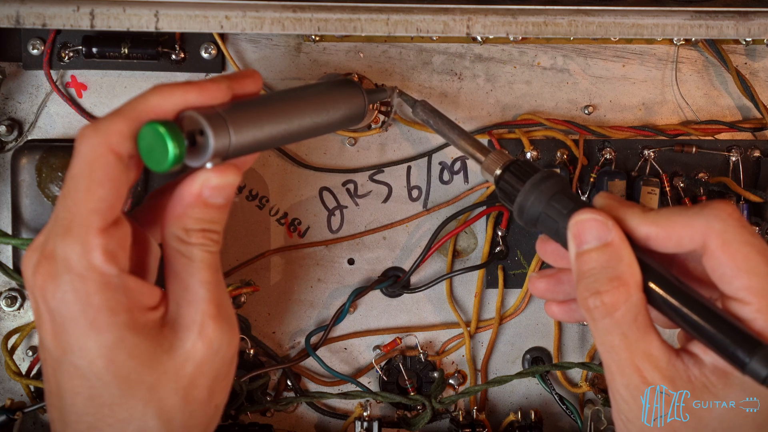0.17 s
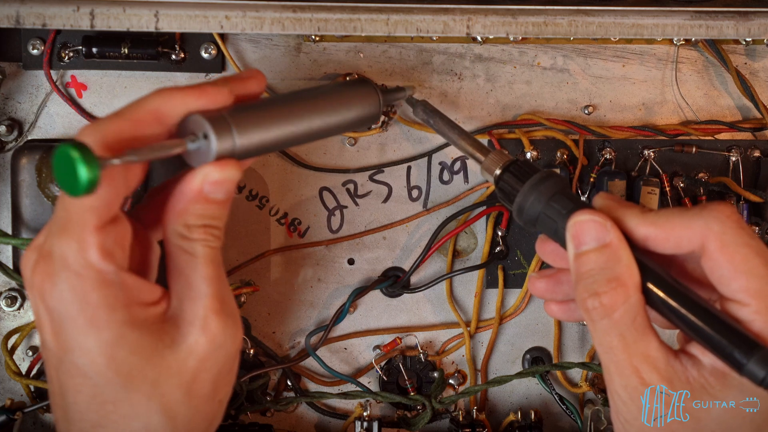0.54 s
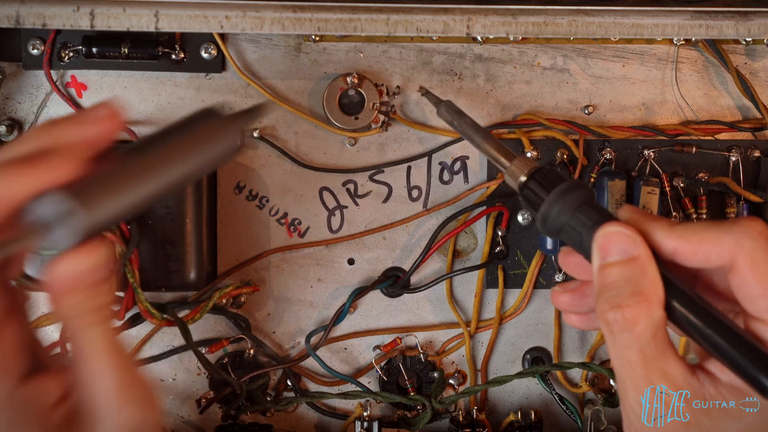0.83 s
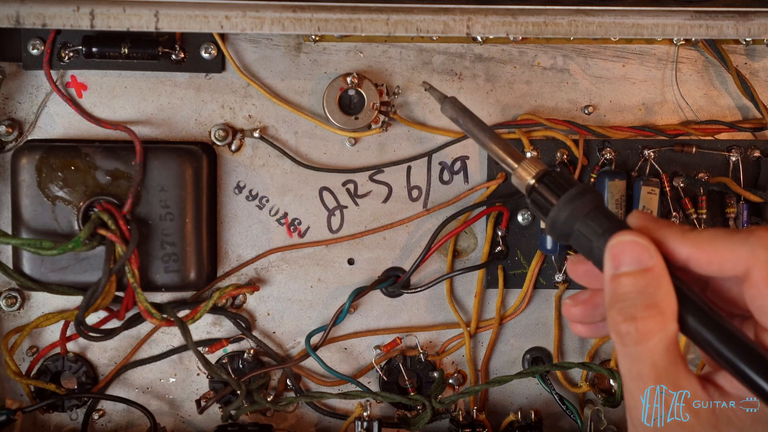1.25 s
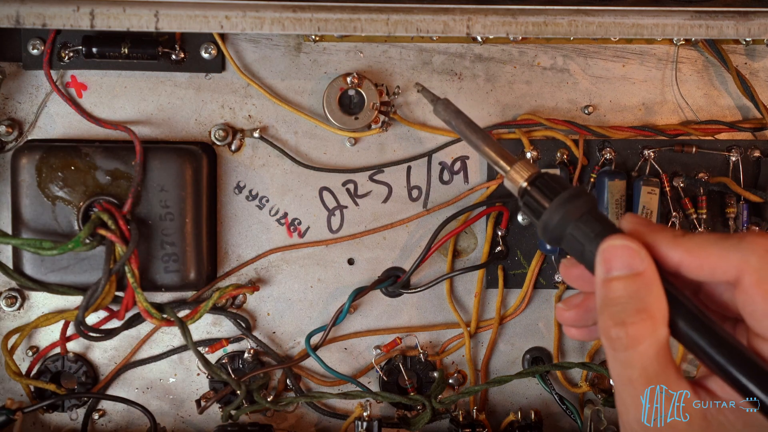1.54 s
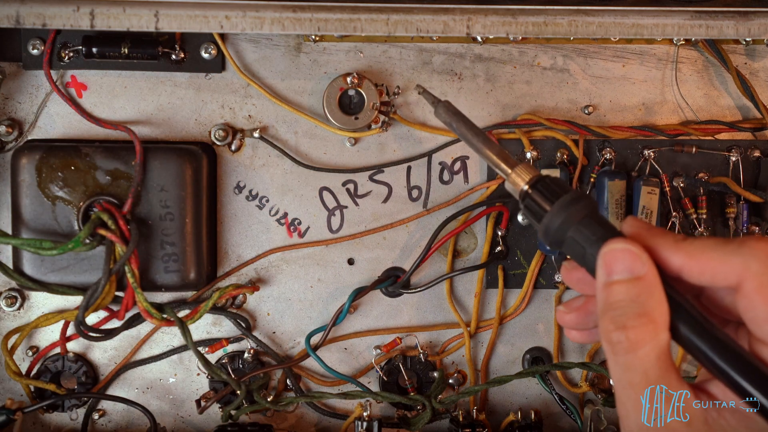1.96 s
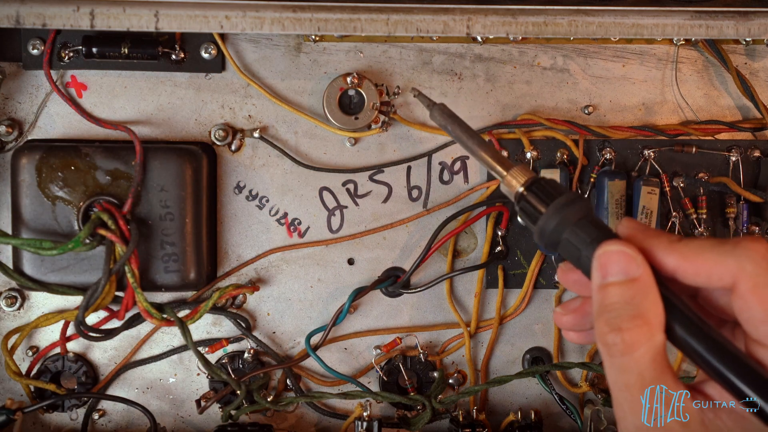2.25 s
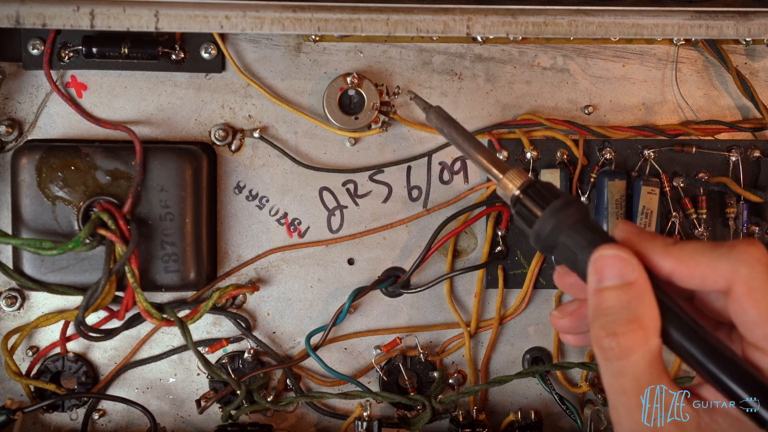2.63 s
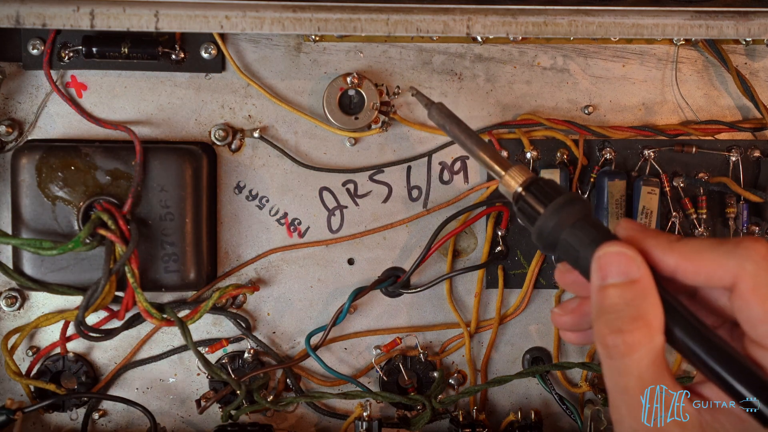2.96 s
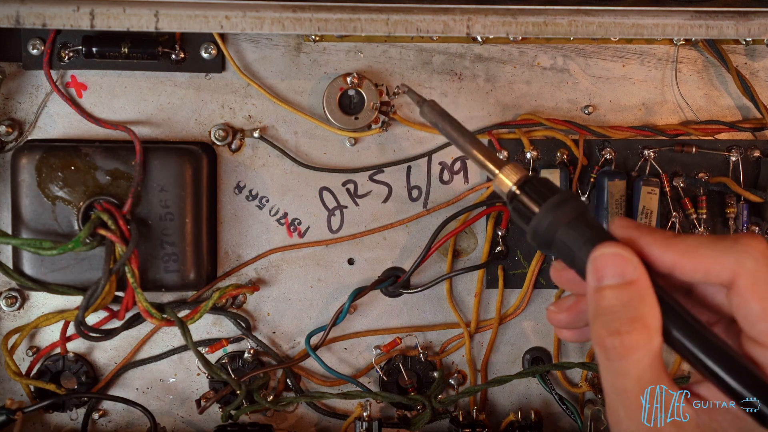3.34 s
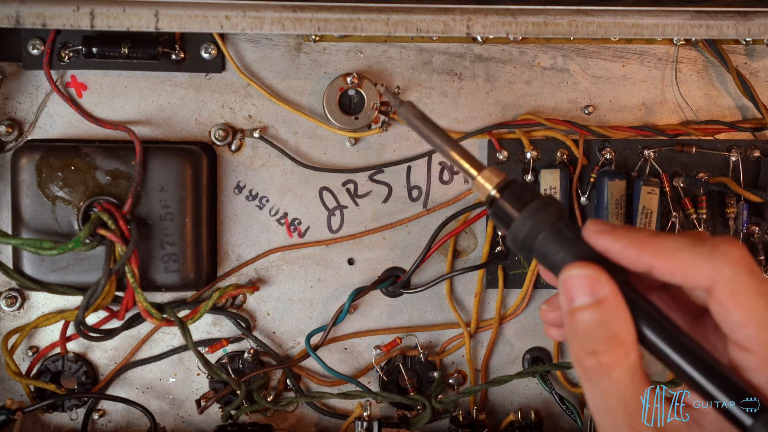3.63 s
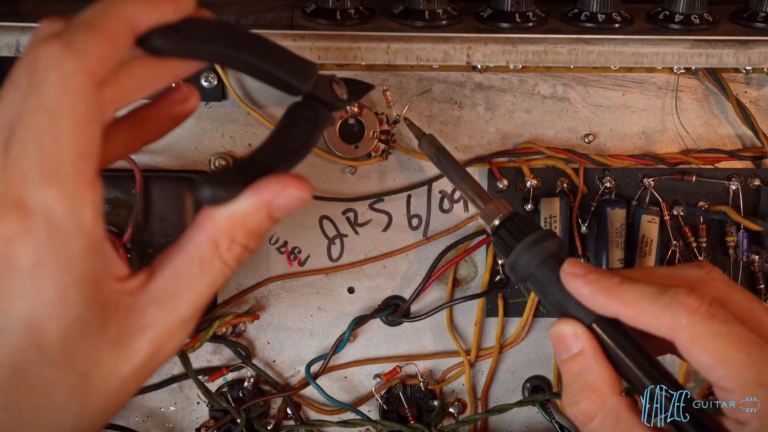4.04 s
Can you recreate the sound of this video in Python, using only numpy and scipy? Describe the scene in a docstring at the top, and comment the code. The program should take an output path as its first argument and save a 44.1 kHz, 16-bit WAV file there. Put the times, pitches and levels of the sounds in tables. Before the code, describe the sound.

One tiny handling click, then a desoldering pump snaps violently against a hollow steel chassis, its low ring fading quickly. A crisp ping comes a little later, then quick clicking and gritty sliding with firm catches and light bench knocks. Sparse small ticks end it. The microphone is close and dry, with short bench reflections, a small room tail, and low hiss and hum.

```python
"""Solder pump at a bench

A spring-loaded pump fires against a steel amplifier chassis, then is cocked and handled beside a bench.
Noise-driven modal bodies make the piston rattle, latch clicks and pings; dying sines boom the chassis and bench.
Dense small slips make the scrapes, with a noise puff and a sine squeak; a quiet hum and hiss run beneath.
The bench top and a small room throw the contacts back as early echoes and sparse dying taps."""
import sys
import numpy as np
from scipy import signal
from scipy.fft import rfft, irfft
from scipy.io import wavfile
from scipy.ndimage import uniform_filter1d

SR = 44100
rng = np.random.default_rng(int(sys.argv[2]) if len(sys.argv) > 2 else 0)


def int16_out(signal):
    """Quantize to a 16-bit WAV file."""
    q = np.round(np.clip(np.atleast_2d(signal).T, -1, 1) * 32767)
    wavfile.write(sys.argv[1], SR, q.astype(np.int16))


N = 184646


def gain_of(db):
    """Decibels to gain."""
    return 10 ** (np.asarray(db) / 20)


def evened(x):
    """Scales to rms 1."""
    return x / np.sqrt(np.mean(x ** 2) + 1e-20)


def read(points, hz):
    """Reads a (Hz, value) table on a log frequency axis."""
    f, value = np.transpose(points)
    return np.interp(np.log(hz + 1), np.log(f + 1), value)


def add(mix, start_s, sound):
    """Mixes a sound in at a time."""
    part = mix[max(round(start_s * SR), 0):][:len(sound)]
    part += sound[:len(part)]


def ring(modes, seconds):
    """Dying sines that take about a cycle to build up; neighbours swing in opposite sense."""
    hz, db, t60_s = np.transpose(modes)[:, :, None]
    t = np.arange(round(seconds * SR)) / SR
    sense = (-1) ** np.arange(len(modes))[:, None]
    envelope = gain_of(db - 60 * t / t60_s) * (1 - np.exp(-2.5 * hz * t))
    return (sense * envelope * np.sin(2 * np.pi * hz * t)).sum(0)


def tick(modes, extra_db=0., damping=0.88):
    """The causal answer of a small, well damped body to one sharp tap; it radiates little bass."""
    f = np.fft.rfftfreq(2048, 1 / SR)
    hz, width_hz, db = np.transpose(modes)[:, :, None]
    resonance = 1 / (1 + (2 * (f - hz) / width_hz / damping) ** 2) ** 2
    power = (gain_of(2 * (db + extra_db)) * resonance).sum(0)
    log_gain = np.log(power / (1 + (850 / (f + 1)) ** 4) + 1e-10) / 2
    # folding the cepstrum gives minimum phase
    cepstrum = irfft(log_gain)
    cepstrum[1:1024] *= 2
    cepstrum[1025:] = 0
    return irfft(np.exp(rfft(cepstrum)))[:1024]


def strike(near, far, start_s, modes, peak_db, contact_ms, colour_db=0.):
    """A rough contact drives the body; the room, hearing it from all sides, gets a more even colour."""
    t = np.arange(800) / SR * 1000 / np.clip(contact_ms, .02, 6)
    contact = np.exp(-t) * rng.standard_normal(len(t)) * 0.84 * contact_ms
    contact[0] = .75  # first touch
    sound = signal.fftconvolve(tick(modes, colour_db), contact)
    sound *= gain_of(peak_db) / abs(sound).max()
    spread = tick(modes, colour_db, damping=1.8)
    add(near, start_s, sound)
    add(far, start_s, spread * np.linalg.norm(sound) / np.linalg.norm(spread))


# Hiss colour. Each row: frequency in Hz, relative level in dB.
HISS = [(15, -60), (25, -28.5), (48, -9), (180, -7.5), (206, -14), (229, -1), (263, -4), (326, -5.5),
        (545, -15.5), (591, -12.5), (1160, -12.5), (1560, -17), (2760, -25.5), (14800, -33.5),
        (16000, -42.5)]
HISS_DB = -65.5
# Mains hum. Each row: frequency in Hz, level in dB rms about which it wavers.
HUM = [(60, -86.5), (120, -77.5), (180, -82.5), (241, -75.5), (360, -78.5), (470, -85)]


def background():
    """Room air and microphone hiss with drifting patches below 2 kHz, and a wavering mains hum."""
    frames, hz = N // 512 + 5, np.fft.rfftfreq(2048, 1 / SR)
    real, imaginary, patches = rng.standard_normal((frames, 1025, 3)).T
    patches = evened(uniform_filter1d(uniform_filter1d(patches, 16, 0), 10, 1))
    colour_db = read(HISS, hz)[:, None] + 0.43 * patches * (hz[:, None] < 2000)
    spectrum = (real + 1j * imaginary) * gain_of(colour_db)
    out = gain_of(HISS_DB) * evened(signal.istft(spectrum, nperseg=2048, noverlap=1536)[1][:N])
    t = np.arange(N) / SR
    for hum_hz, db in HUM:
        waver = evened(uniform_filter1d(uniform_filter1d(rng.standard_normal(N), 3000), 3000))
        tone = np.sqrt(2) * np.sin(2 * np.pi * (hum_hz * t + rng.random()))
        out += gain_of(db + 2.5 * waver) * tone
    return out


# Latch body modes. Each row: frequency in Hz, width in Hz before damping, relative level in dB.
LATCH = [(1070, 1900, -15.5), (2078, 777, -9.5), (3225, 1200, -8), (4010, 507.6, 0.5), (4426, 450, 3),
         (5063, 640, -3), (5650, 460, -18), (7010, 1770, -12.5), (8630, 2000, -19.5), (11900, 2400, -24.5),
         (14740, 1800, -27)]
# Single handling clicks. Each row: start in seconds, peak in dB before the mix, low-mode boost in dB.
CLICKS = [(.0089, -19.5, 13), (.1918, -58, -2), (1.850, -42.5, 1), (1.8993, -37, -3.5), (1.9415, -42.5, 2),
          (1.9593, -32, 5), (1.9663, -3, -19), (1.9854, -27, -0.5), (1.9957, -30, 4), (2.0132, -30, 6),
          (2.0222, -31.5, 9), (2.379, -40.5, -2.5), (2.391, -35.5, 16), (2.3981, -27.5, 5.5),
          (2.421, -36.5, 9), (2.5322, -39.5, -2), (3.3882, -55, 12), (3.4596, -59, -2)]
# Plunger pressed home. Each row: catch in seconds, reference level in dB, ride in ms.
LATCHINGS = [(2.2411, -7.5, 27.1), (2.581, -3, 22.7)]
# Parts of one latching. Each row: place in rides from the catch, level in dB re the latching,
# low-mode boost in dB.
STEPS = [(-0.99, -16.5, 3.5), (-0.38, -14, 4.5), (0, -1, 2.5), (0.45, -22, 8)]
CONTACT_MS, CONTACT_MS_PER_DB, LONGEST_MS = .25, 0.4, 1.5  # practically all clicks touch for about 1.5 ms
HIGH_DB, SOFTER_HIGH_DB_PER_DB = 5.5, 0.082  # high-mode boost, and its rise per dB lighter


def latch_clicks(near, far):
    """Contacts of about 1.5 ms ring the damped latch; lighter ones get more high-mode boost."""
    hz = np.transpose(LATCH)[:1].T
    steps = [(catch_s + place * ride_ms / 1000, db + step_db, low_db)
             for catch_s, db, ride_ms in LATCHINGS for place, step_db, low_db in STEPS]
    for start_s, peak_db, low_db in [*CLICKS, *steps]:
        contact_ms = min(CONTACT_MS - CONTACT_MS_PER_DB * peak_db, LONGEST_MS)
        high_db = HIGH_DB - SOFTER_HIGH_DB_PER_DB * peak_db
        colour_db = low_db * (hz < 2600) + high_db * (hz > 5400)
        colour_db = colour_db - 2.9 * contact_ms * (hz > 10000)  # the contact is dull at the very top
        strike(near, far, start_s, LATCH, peak_db, contact_ms, colour_db)


# Barrel modes. Each row: frequency in Hz, width in Hz before damping, relative level in dB.
BARREL = [(790, 499.5, -16), (1380, 698.5, -11.5), (2180, 799, -11.5), (3150, 799, -7.5), (5015, 798, -2.5),
          (5740, 797.5, -2), (6790, 600.5, -7.5), (8250, 1199, -11.5), (11000, 2500, -23.5),
          (14600, 2503.5, -23.5)]
SNAP_S, SNAP_DB = .5214, 1.5  # piston hits its stop
TOUCH_MS, TOUCH_DB = 1.4, -28.5  # light touch just before
RATTLE_GAP_MS, RATTLE_DB, RATTLE_FADE_DB = 4., -14.5, -1.9  # mean gap; fade per bounce


def piston(close, far, bounces=5):
    """First touch, main blow and uneven, weakening bounces of the piston ring the barrel."""
    k = np.arange(1, bounces + 1)
    bounce_s = SNAP_S + (k + rng.uniform(-.3, .3, bounces)) * RATTLE_GAP_MS / 1000
    bounce_db = RATTLE_DB + RATTLE_FADE_DB * k
    blows = [(SNAP_S - TOUCH_MS / 1000, TOUCH_DB), (SNAP_S, SNAP_DB), *zip(bounce_s, bounce_db)]
    for start_s, peak_db in blows:
        strike(close, far, start_s, BARREL, peak_db, contact_ms=.3)


PUFF_DB, PUFF_T60_S = -20.5, 0.11


def puff():
    """Air rushes in at the nozzle: dying band-passed noise."""
    out, t = np.zeros(N), np.arange(SR // 5) / SR
    band = signal.butter(1, [900., 9000.], "bandpass", fs=SR, output="sos")
    air = signal.sosfilt(band, rng.standard_normal(len(t)))
    add(out, SNAP_S, gain_of(PUFF_DB - 60 * t / PUFF_T60_S) * air)
    return out


# Steel chassis modes. Each row: frequency in Hz, relative level in dB, t60 in seconds.
CHASSIS = [(64, -14.5, 0.28), (90.2, -20.5, 1.4), (105, -7.5, 0.12), (127.2, -14, 0.31), (170, -11, 0.055),
           (251, -26.5, 0.16), (327.3, -30, 0.093), (592, -11, 0.091), (740, 1, 0.077), (772, -10, 0.15),
           (906.6, -11, 0.088), (990, -16.5, 0.12), (1144, -11, 0.07), (1428, -13, .06), (1560, -12, 0.042)]
KICK_MS, KICK_DB = .8, -13  # recoil reaches the chassis


def chassis_boom():
    """The pump tip kicks the steel chassis, whose modes boom on."""
    out = np.zeros(N)
    add(out, SNAP_S + KICK_MS / 1000, gain_of(KICK_DB) * ring(CHASSIS, 2))
    return out


# Modes of the pings. Each row: frequency in Hz, width in Hz before damping, relative level in dB.
PIN = [(2495, 900, -36), (3497, 740, -29), (4946, 960, -19.5), (6750, 1100, -17.5), (7580, 700, -14.5),
       (8120, 500, -3.5), (8610, 745, -11.5), (13400, 3400, -41)]
# Two pings of a small steel part and, between them, a very faint, short high tick just before the last ping.
# Each row: start in seconds, peak in dB before the mix, contact in ms, low-mode boost in dB.
PINGS = [(1.136, -1, 1, -4), (3.0341, -55, 0.4, 2), (3.0752, -19.5, 1, 7)]


def pings(near, far):
    """Rough contacts ring high modes: two pings of a small steel part, and a very faint high tick."""
    low = np.transpose(PIN)[:1].T < 4000
    for start_s, peak_db, contact_ms, low_db in PINGS:
        strike(near, far, start_s, PIN, peak_db, contact_ms, low_db * low)


# Rod squeak. The row: start in seconds, centre frequency in Hz, level in dB, length in seconds.
SQUEAK = (1.3, 3380, -63, .06)


def squeak():
    """The rod squeaks in its guide: a short sine of unsteady pitch."""
    out = np.zeros(N)
    start_s, hz, db, length_s = SQUEAK
    count = round(length_s * SR)
    unsteady = 1 + .3 * uniform_filter1d(rng.standard_normal(count), 60)
    tone = np.sin(2 * np.pi * np.cumsum(hz * unsteady) / SR)
    add(out, start_s, gain_of(db) * np.hanning(count) * tone)
    return out


# Bench modes. Each row: frequency in Hz, relative level in dB, t60 in seconds.
BENCH = [(81, -17, 0.08), (129.2, -18, 0.078), (225, -10, 0.038), (284, -11, 0.0393), (363, -5.5, 0.081),
         (525, -4, 0.034), (671, -11.5, 0.02), (936, -6.5, 0.027), (1890, -7, 0.0076), (3600, -6, 0.0054)]
# Plunger and fingers on the barrel. Each row: start in seconds, end in seconds, level in dB,
# swell in dB over the stroke.
SLIDES = [(1.3, 1.37, -68.5, -1), (1.69, 1.79, -78.5, 3.), (1.774, 1.965, -60.5, 5), (2.335, 2.44, -61, 5),
          (3.82, 4.025, -80.5, 4)]
SLIDE_RISE_S, SLIDE_FALL_S = .045, .02
LEAD_MS, LEAD_DB = 12., -42  # scrape leads into the ride and lasts to the catch


def scrapes():
    """Dense small slips of uneven size ring the latch and shake the bench."""
    slips = gain_of(3.6 * np.minimum(rng.exponential(1, N), 5)) * (rng.random(N) < 3500 / SR)
    slips *= rng.standard_normal(N)
    colour_db = np.array([-8., -8., -1., 0., -2., 3., 8., 7., 0., -4., -8.])[:, None]  # per latch mode
    grit = evened(signal.oaconvolve(slips, tick(LATCH, colour_db, damping=1.9))[:N])
    grit += gain_of(-5.0) * evened(signal.oaconvolve(slips, ring(BENCH[:3], .1))[:N])
    t, level = np.arange(N) / SR, np.zeros(N)
    for start_s, end_s, db, swell_db in SLIDES:
        edges = np.clip(np.minimum((t - start_s) / SLIDE_RISE_S, (end_s - t) / SLIDE_FALL_S), 0, 1)
        stroke = np.clip((t - start_s) / (end_s - start_s), 0, 1)
        level += edges * gain_of(db + swell_db * stroke)
    for catch_s, db, ride_ms in LATCHINGS:
        lead = 1 + (t - catch_s + ride_ms / 1000) * 1000 / LEAD_MS
        level += gain_of(db + LEAD_DB) * np.clip(lead, 0, 1) ** 2 * (t < catch_s)
    return grit * uniform_filter1d(level, 100)


# Lone bench knock. Each row: start in seconds, relative level in dB.
KNOCKS = [(3.611, -43)]
HAND_DB = -17.5  # hand knock re the latching


def bench_knocks():
    """The hand knocks the bench at each catch, and a lone knock follows; the bench modes ring briefly."""
    out = np.zeros(N)
    hand = [(catch_s, db + HAND_DB) for catch_s, db, ride_ms in LATCHINGS]
    for start_s, db in [*KNOCKS, *hand]:
        add(out, start_s, gain_of(db) * ring(BENCH, 0.13) / 2)
    return out


# Nearby surfaces. Each row: delay in ms, level in dB re direct.
ECHOES = [(1.1, -14.5), (2.2, 2.5), (2.9, -8), (4.6, -9), (8, -11), (15, -17)]
# Room decay. Each row: frequency in Hz, t60 in seconds.
ROOM = [(100, 1), (600, 0.5), (1500, 0.34), (3500, .27), (9000, .25), (15000, .15)]
ROOM_DB = -8.5
CLUTTER_DB, CLUTTER_T60_S = 1, 0.038  # scatter off things on the bench


def room(near, far):
    """The bench top and near things echo first; sparse taps die away as clutter and, band by band, as room."""
    early, t = np.zeros(SR // 40), np.arange(SR // 2) / SR
    early[0] = 1
    for ms, db in ECHOES:
        early[round(ms * SR / 1000)] += gain_of(db)
    taps = np.zeros(SR // 2)
    at = np.arange(130, SR // 2 - 8, 8)
    taps[at + rng.integers(0, 8, len(at))] = rng.choice([-1., 1.], len(at))
    clutter = taps * gain_of(-60 * t / CLUTTER_T60_S)
    # reversed taps keep the room tail unlike the clutter
    hz, frame_s, spectrum = signal.stft(taps[::-1] * (t > .006), SR, nperseg=256)
    decay = gain_of(-60 * frame_s / read(ROOM, hz)[:, None])
    tail = signal.istft(spectrum * decay, SR, nperseg=256)[1][:SR // 2]
    late = gain_of(CLUTTER_DB) * clutter / np.linalg.norm(clutter)
    late += gain_of(ROOM_DB) * tail / np.linalg.norm(tail)
    return signal.oaconvolve(near, early)[:N] + signal.fftconvolve(far, late)[:N]


def scene():
    """All contacts share the room; the background lies under them."""
    close, near, far = np.zeros((3, N))
    latch_clicks(near, far)
    piston(close, far)
    pings(near, far)
    slide = puff() + squeak() + scrapes()
    thud = chassis_boom() + bench_knocks()
    echoed = .55  # the snap is nearer the microphone, so less of it comes back off the bench
    wet = room(echoed * close + near + slide, far + slide + gain_of(-10) * thud)
    wet += (1 - echoed) * close
    return (gain_of(-4.0) * wet + thud + background())[None]


EDGE_HZ = 16000


def record(dry):
    """The microphone drops the deepest bass; a low-pass then sets the band limit."""
    dry = signal.sosfilt(signal.butter(3, 48., "highpass", fs=SR, output="sos"), dry)
    low_pass = signal.firwin(255, EDGE_HZ, window=("kaiser", 9), fs=SR)
    return signal.oaconvolve(dry, low_pass[None], "same")


dry = scene()
out = record(dry)
int16_out(out)
```